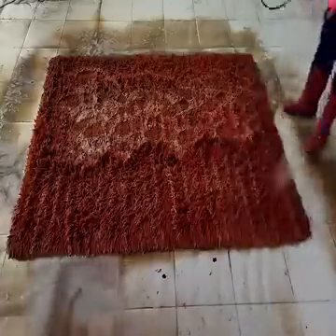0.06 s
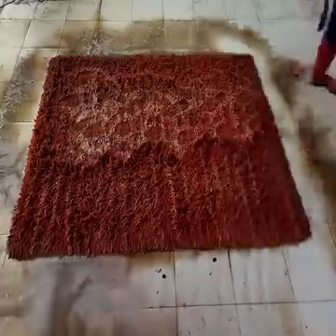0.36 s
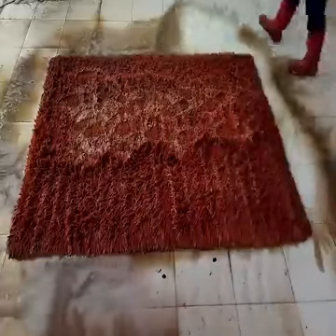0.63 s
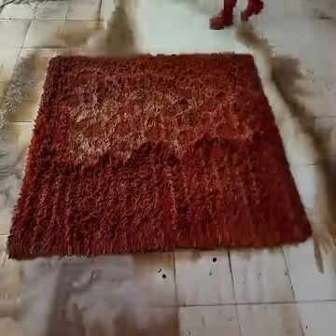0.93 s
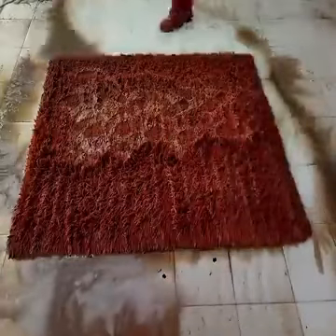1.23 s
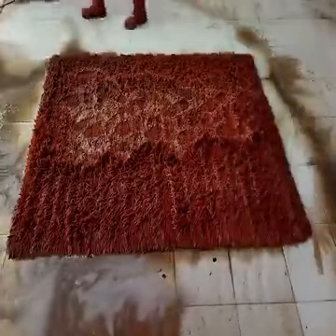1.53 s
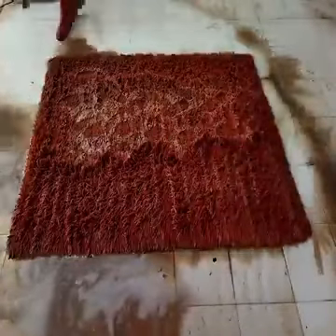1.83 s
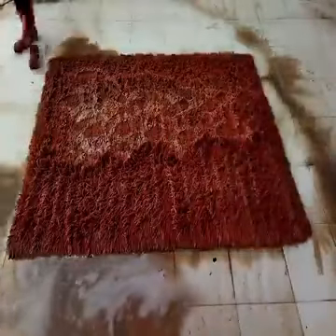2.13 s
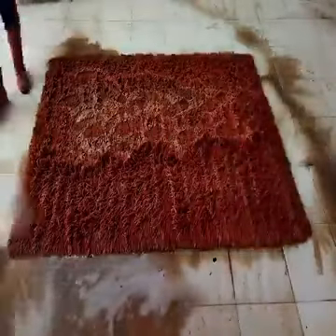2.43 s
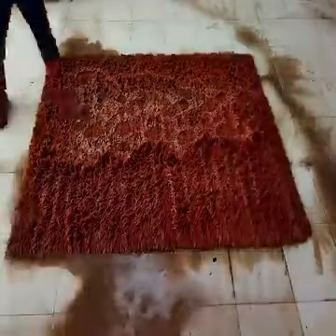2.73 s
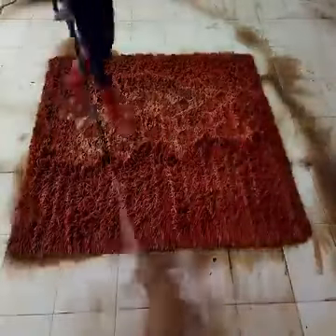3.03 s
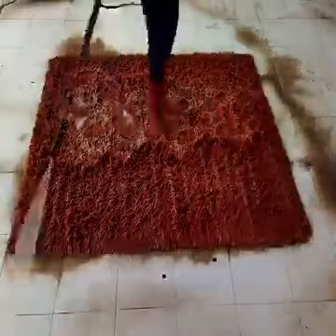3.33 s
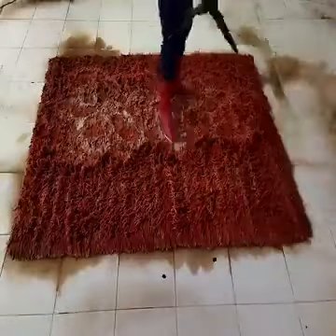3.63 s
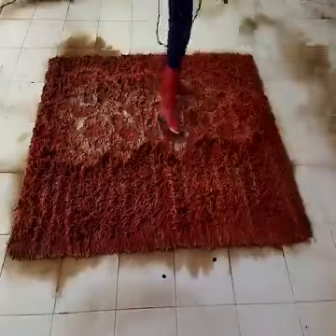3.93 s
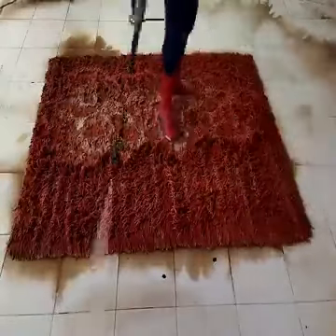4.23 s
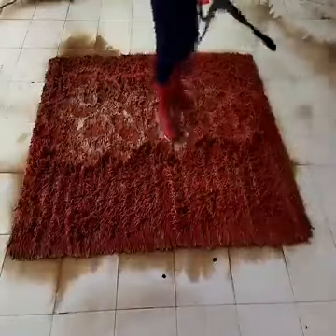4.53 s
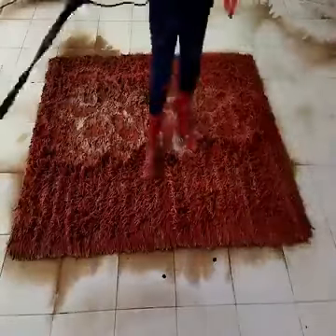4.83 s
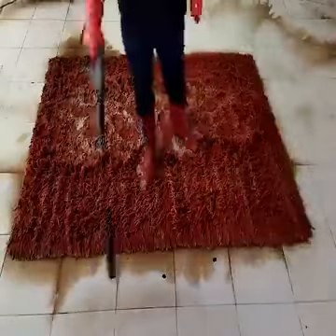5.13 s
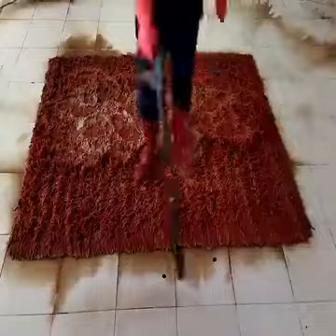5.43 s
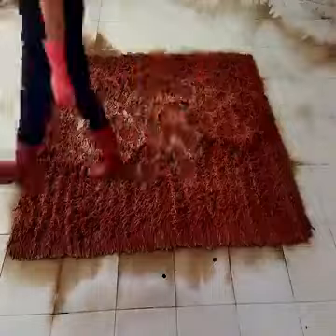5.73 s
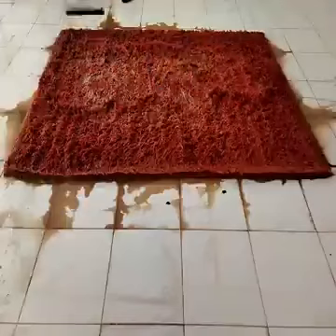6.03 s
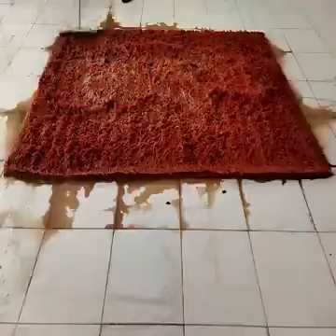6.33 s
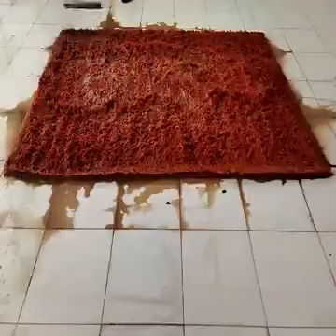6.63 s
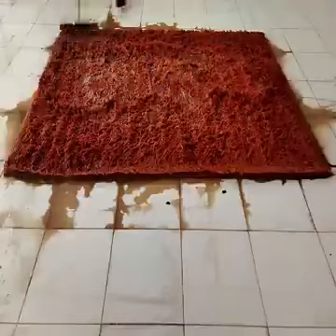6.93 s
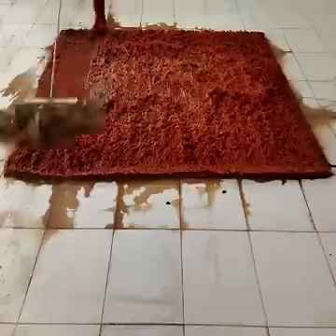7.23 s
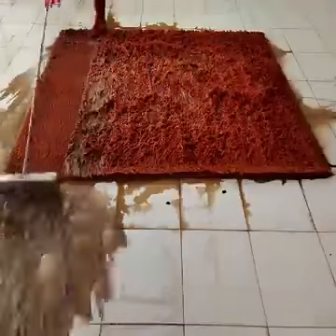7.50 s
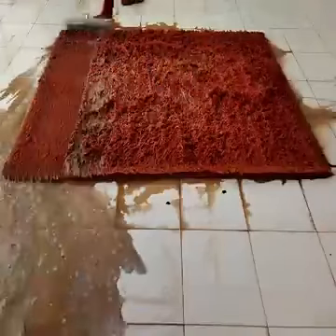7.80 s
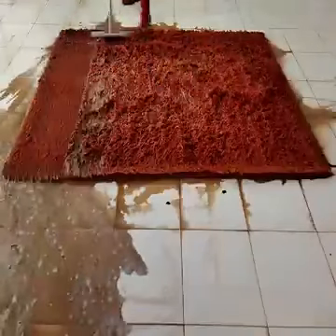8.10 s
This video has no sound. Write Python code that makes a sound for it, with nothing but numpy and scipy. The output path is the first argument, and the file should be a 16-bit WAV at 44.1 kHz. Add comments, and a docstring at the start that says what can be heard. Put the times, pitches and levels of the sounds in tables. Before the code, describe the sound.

In a reverberant tiled wash hall, the bright hiss of a water jet and a high, wavering pump whine hold steady, then cut off. Faint, distant wet slaps follow as a rubber squeegee is set on a soaked carpet. One sloshing, fizzy stroke ends in a sharp, ringing clatter on the floor, with water squirting toward the microphone and trickling away. Then another wet stroke starts.

```python
"""In a tiled wash hall, a pressure washer works over a shaggy carpet: its pump whines at multiples
of the shaft speed and its turbulent jet hisses, until both stop abruptly. A long-handled squeegee
is set down with wet slaps and pushed through the soaked pile, which sloshes and froths. Its head
drops off the edge and clatters on the tiles, ringing in its own modes; water spills, the hall
reverberates, and a second push follows."""
import sys
import numpy as np
from scipy import signal
from scipy.fft import rfft, irfft, next_fast_len
from scipy.io import wavfile
from scipy.ndimage import uniform_filter1d, map_coordinates

SR = 44100
rng = np.random.default_rng(int(sys.argv[2]) if len(sys.argv) > 2 else 0)


def wrap_up_sound(samples):
    """Save the sound to the file named by the first command line argument, as 16-bit audio."""
    columns = np.atleast_2d(samples).T
    # keep every value between -1 and 1, then stretch to whole-number steps
    tamed = np.clip(columns, -1, 1)
    steps = np.round(tamed * 32767).astype(np.int16)
    wavfile.write(sys.argv[1], SR, steps)


N = 368670
TIME = np.arange(N) / SR
SHAFT_HZ, STOP_S = 95.6, 5.98  # the pump's rotation rate; the moment the washer falls silent

# Pushes through the pile: start_s, length_s, relative_db, first_touch_lead_s
STROKES = [(7.107, .41, -39, 0.034), (8.204, .41, -39.5, 0.05)]
# Bounces of the head: start_s, relative_db, crack_tilt_db_per_octave, ring_tilt_db_per_octave
BOUNCES = [(7.5102, -6, 3, 2), (7.521, -2, -0.5, 1), (7.544, -7, -4, 6.5), (7.567, -7, -2.5, -2),
           (7.574, -9.5, -1.5, -2), (7.589, -6, -2, -1), (7.604, -7.5, 2, 4.5)]
# Spectrum of water squeezed out as froth: frequency_hz, relative_db
FROTH_SPECTRUM = [(1060, -35), (1800, -3.5), (4810, -6), (7540, -14.5), (8870, -12), (11300, -21),
                  (12800, -15), (15500, -26)]


def amp(db):
    """Amplitude ratio of a level in decibels."""
    return 10 ** (np.asarray(db) / 20)


def unit(x):
    """Normalisation to an rms of 1."""
    return x / np.sqrt(np.mean(x ** 2) + 1e-20)


def along(points, hz):
    """Interpolation of (frequency_hz, value) points on a logarithmic frequency axis."""
    frequencies, values = np.transpose(points)
    return np.interp(np.log(hz + 1), np.log(frequencies + 1), values)


def hump(centre_s, half_s):
    """A Gaussian envelope of height 1, down to 1/e at half_s from its centre."""
    return np.exp(-((TIME - centre_s) / half_s) ** 2)


def wobble(rate_hz):
    """Smooth random modulation: a spline through rate_hz random knots a second."""
    knots = rng.standard_normal(int(N * rate_hz / SR) + 4)
    return np.interp(TIME, TIME[::32], map_coordinates(knots, [TIME[::32] * rate_hz]))


def add(track, start_s, sound):
    """Superposition of a sound on the track from start_s on."""
    part = track[..., round(start_s * SR):][..., :sound.shape[-1]]
    part += sound[..., :part.shape[-1]]


def filtered(x, response):
    """Linear filtering: the spectrum of x is multiplied by a frequency response."""
    size = next_fast_len(x.shape[-1] + 8192, True)
    return irfft(rfft(x, size) * response(np.fft.rfftfreq(size, 1 / SR)), size)[..., :x.shape[-1]]


def diffuse(pair, colour):
    """A diffuse field of rms 1 from two unrelated signals: the ears agree in bass, not in treble."""
    # Stereo width of the field: frequency_hz, side_minus_mid_db
    width = [(40, -19), (130, -35), (260, -23.5), (500, -8.5), (800, -9), (1300, -2), (2200, 3), (4400, -1),
             (8000, 0.5), (15000, -1.5)]
    mid = filtered(pair[0], colour)
    side = filtered(pair[1], lambda hz: colour(hz) * amp(along(width, hz)))
    return unit(np.array([mid + side, mid - side]))


def rush(spectrum):
    """Diffuse noise: white noise filtered to the given spectrum."""
    return diffuse(rng.standard_normal((2, N)), lambda hz: amp(along(spectrum, hz)))


def burst(spectrum, tilt_db, t60_s):
    """An exponentially damped puff of noise of energy 1, tilted by tilt_db per octave."""
    t = np.arange(SR // 3) / SR
    puff = rng.standard_normal(len(t)) * amp(-60 * t / t60_s)
    puff = np.pad(puff, (48, 0))[:len(t)]  # room for the filter to spread the onset
    colour = lambda hz: amp(along(spectrum, hz) + tilt_db * np.log2(np.maximum(hz, 300) / 1000))
    puff = filtered(puff, colour)
    return puff / np.linalg.norm(puff)


def bubbles(count, centre_hz, spread, cycles, size_db):
    """Bubble resonance: brief damped sines with soft starts, at random moments for each ear."""
    n = np.arange(int(8 * cycles * SR / centre_hz))
    ears = []
    for ear in range(2):
        starts = (rng.random(count) * N).astype(int)[:, None]
        hz = np.clip(centre_hz * np.exp(spread * rng.standard_normal(count)), 200, SR / 3)[:, None]
        strength = amp(size_db * np.minimum(rng.exponential(size=count), 4))[:, None]
        age = hz * n / SR / cycles  # in decay time constants
        ring = strength * np.sin(2 * np.pi * cycles * age) * age * np.exp(-age)
        ears.append(unit(np.bincount((starts + n).ravel(), ring.ravel(), N)[:N]))
    return np.array(ears)


def drift(stray_hz):
    """Frequency modulation: the phase gathered by a tone whose pitch strays quickly."""
    return 2 * np.pi * np.cumsum(stray_hz * wobble(70)) / SR


def tone(phase, db, apart_rad):
    """A sine of rms level db; standing waves set its phase apart at the two ears."""
    phases = np.mod(phase, 2 * np.pi) + np.array([[.5], [-.5]]) * apart_rad
    return np.sqrt(2) * amp(db) * np.sin(phases.astype(np.float32))


def fading(depth_db):
    """Shifting standing waves raise and lower a tone's level in dB, differently at each ear."""
    return depth_db * np.array([wobble(6), wobble(6)])


def hall(x, direct_db, build_s):
    """Reverberation: the direct path, then a diffuse tail that builds up and decays band by band."""
    # Reverberation time of the tiled hall: frequency_hz, t60_s
    decay_times = [(100, 1.4), (400, 1.21), (750, 0.62), (1250, 1.02), (1800, 1.07), (4000, 1.02),
                   (7000, 0.93), (14000, 0.74)]
    hz, t, noise = signal.stft(rng.standard_normal((2, SR)), SR, nperseg=256)
    decay = amp(-60 * t / along(decay_times, hz)[:, None])
    tail = signal.istft(noise * decay * (1 - np.exp(-t / build_s)), SR, nperseg=256)[1]
    response = diffuse(tail, np.ones_like) / np.sqrt(tail.shape[1])
    response[:, 0] += amp(direct_db)
    return signal.fftconvolve(x[None], response, axes=1)


def hall_air():
    """Incoherent noises add in power: quiet air, a wash fading after the washer, run-off on tiles."""
    # Spectrum of the background: frequency_hz, relative_db
    air_spectrum = [(18, -58), (30, -31), (113, -16), (147, -3), (312, 1), (978, -9.5), (3980, -17.5),
                    (5880, -20), (7060, -19), (11900, -24.5), (15000, -31)]
    linger = (TIME > STOP_S) * amp(-55.5 - 37 * np.maximum(TIME - STOP_S, 0))
    runoff = (TIME > BOUNCES[0][0]) * amp(-63)
    return np.sqrt(amp(-65) ** 2 + linger ** 2 + runoff ** 2) * rush(air_spectrum)


def bumps():
    """Narrow-band noise in short swells is heard as hollow bumps, under the washer and as it stops."""
    # Dull bumps: centre_s, half_length_s, pitch_hz, width_hz, level_db
    dull_bumps = [(2.083, 0.016, 700, 220, -30), (5.83, 0.031, 570, 120, -44), (5.875, 0.024, 393, 50, -42)]
    out = np.zeros(N)
    for centre_s, half_s, pitch_hz, width_hz, db in dull_bumps:
        band = filtered(rng.standard_normal(N), lambda hz: np.exp(-((hz - pitch_hz) / width_hz) ** 2))
        out += amp(db) * hump(centre_s, half_s) * unit(band)
    return out


def blade_slaps():
    """Rubber lands on wet pile far off, so the reverberant sound outweighs the direct puff."""
    # Wet slaps: start_s, relative_db, tilt_db_per_octave, t60_s, rise_s
    landings = [(6.012, -43, -6, 0.087, .004), (6.186, -35.5, 0, 0.081, 0.0051),
                (6.37, -38, -0.8, 0.26, .003), (6.718, -50, 2.5, 0.36, 0.0045),
                (7.017, -30, 0.5, 0.09, .001), (7.127, -32.5, -9, 0.14, .006), (8.128, -37, 0, .2, .006),
                (8.201, -30.5, -2.5, 0.037, .001)]
    # Spectrum of a slap: frequency_hz, relative_db
    slap_spectrum = [(100, -42), (200, -20), (500, -4), (800, 2), (1100, -3.5), (1600, 1.5), (2300, -2.5),
                     (4000, -3), (7000, -9), (11000, -12), (15500, -18)]
    out = np.zeros((2, N))
    for start_s, db, tilt_db, t60_s, rise_s in landings:
        click = burst(slap_spectrum, tilt_db, t60_s=.00001)
        add(out, start_s, amp(db + 22.5) * hall(click, direct_db=-60, build_s=rise_s + t60_s / 20))
        add(out, start_s, amp(db + 14.5) * burst(slap_spectrum, tilt_db, t60_s))
    return out


def stroke_envelope(attack_s, db_per_s, from_first_touch):
    """Exponential attack, sloping hold and exponential release as the water settles after each push."""
    total, settle_s = np.zeros(N), .06
    for start_s, length_s, db, lead_s in STROKES:
        attack = 1 - np.exp(-np.maximum(TIME - start_s + from_first_touch * lead_s, 0) / attack_s)
        hold = amp(db + db_per_s * np.clip(TIME - start_s, 0, length_s))
        release = np.exp(-np.maximum(TIME - start_s - length_s, 0) / settle_s)
        total += attack * hold * release
    return total


def blade_pushes():
    """Slipping tufts excite the blade's resonance; the water wrung from them sloshes and froths."""
    # Spectrum of the wave ahead of the blade: frequency_hz, relative_db
    slosh_spectrum = [(47, -50), (80, -26), (118, -22), (145, -25), (194, -19), (383, -8.5), (527, -8),
                      (756, -6), (1050, -4.5), (1400, -0.5), (2200, -14), (2860, -21), (4840, -70)]
    tufts_per_s, blade_hz, blade_width_hz = 1200, 767, 110
    # The wave forms at once and thins; the froth grows as the blade comes nearer.
    wave = stroke_envelope(attack_s=.031, db_per_s=-11, from_first_touch=False)
    foam = stroke_envelope(attack_s=.1, db_per_s=7, from_first_touch=True)
    froth = bubbles(count=6000, centre_hz=3440, spread=.68, cycles=1.26, size_db=4)
    slips = (rng.random((2, N)) < tufts_per_s / SR) * rng.choice([-1, 1], size=(2, N))
    scrape = diffuse(slips, lambda hz: 1 / (1 + ((hz - blade_hz) / blade_width_hz) ** 2))
    slosh = amp(-1.7 + wobble(35)) * rush(slosh_spectrum)
    fizz = amp(.5 + .92 * wobble(25)) * rush(FROTH_SPECTRUM)
    # The scrape peaks in mid-stroke, when the blade moves fastest.
    crest = sum(amp(db - 4.5) * hump(start_s + .19, half_s=.14) for start_s, _, db, _ in STROKES)
    return wave * slosh + crest * scrape + foam * (fizz + amp(-8) * froth)


def spill():
    """Water spills off the carpet onto the tiles: a cloud of bubble resonances swells and thins out."""
    rise_s, decay_db_per_s = .06, 60
    age = np.maximum(TIME - BOUNCES[1][0], 0)
    envelope = amp(-27 - decay_db_per_s * age) * (1 - np.exp(-age / rise_s))
    drops = bubbles(count=4000, centre_hz=2900, spread=.6, cycles=3, size_db=3.8)
    return envelope * diffuse(drops, np.ones_like)


def head_clatter():
    """Impact excitation: each bounce rings the head's damped modes, with a wet crack and hard smack."""
    # Modes of the squeegee head and handle: pitch_hz, relative_db, t60_s
    head_modes = [(359, -15.5, 0.23), (439, -5.5, 0.135), (470, -5, 0.21), (651.5, 8, 0.2), (689, 1.5, .16),
                  (772, 10, 0.087), (842, 5, 0.13), (955, -1, 0.069), (1188, 1.5, 0.24), (1225, -4.5, .17),
                  (1290, -5, .13), (1502, -1, 0.068), (1615, 1, 0.2), (2115, -7, 0.089)]
    # Spectrum of the contact with wet tiles: frequency_hz, relative_db
    crack_spectrum = [(80, -44), (180, -25.5), (300, -10.5), (480, -6.5), (590, -6), (850, 4), (1060, 2),
                      (1300, 5.5), (2000, -5), (2600, -4.5), (3200, -16), (4000, -9.5), (5000, -14.5),
                      (8000, -22), (15000, -36)]
    out, t = np.zeros((2, N)), np.arange(SR // 3) / SR
    soft_onset = np.sin(np.pi / 2 * np.minimum(t / .002, 1)) ** 2  # rubber cushions the contact
    for start_s, db, crack_tilt_db, ring_tilt_db in BOUNCES:
        ring = np.zeros(len(t))
        for hz, mode_db, t60_s in head_modes:
            strength = amp(mode_db + ring_tilt_db * np.log2(hz / 1000) + rng.normal(0, 2.2))
            ring += strength * np.sin(2 * np.pi * (hz * t + rng.random())) * amp(-60 * t / t60_s)
        ring *= soft_onset
        ring = hall(ring / np.linalg.norm(ring), direct_db=1, build_s=.0044)
        crack = hall(burst(crack_spectrum, crack_tilt_db, t60_s=.068), direct_db=-12.5, build_s=.0044)
        smack = burst(crack_spectrum, crack_tilt_db, t60_s=.018)
        add(out, start_s, amp(db + 15.5) * (ring + crack))
        add(out, start_s, amp(db + 4.5) * smack)
    # The hardest bounce also thumps the floor.
    thud = np.sin(2 * np.pi * 60 * t) * np.exp(-t / .0045)
    add(out, BOUNCES[1][0], amp(-33 + np.array([[-1.6], [1.6]])) * thud)
    # The first contact squirts the water film under the blade straight at the microphone.
    squirt = hall(burst(FROTH_SPECTRUM, tilt_db=3, t60_s=.07), direct_db=1, build_s=.03)
    add(out, BOUNCES[0][0], amp(-3) * squirt)
    return out


def pump_whines():
    """Shaft harmonics: a clean whine at the 11th, rougher ones at the 15th and 16th."""
    # Level contour of the main whine: time_s, relative_db
    contour = [(0.0, -35.5), (0.15, -33), (1.78, -31.5), (1.88, -35.5), (2.07, -34), (2.19, -28.5),
               (2.34, -35), (2.68, -32), (3.12, -34), (3.29, -30), (3.52, -32.5), (4.69, -33.5),
               (4.97, -30), (5.2, -33), (5.73, -31.5), (5.8, -38.5), (5.86, -31)]
    # Swells of the second whine: centre_s, half_length_s, relative_db
    swells = [(1.05, .14, -45), (1.396, 0.036, -42), (1.833, .08, -42), (2.03, 0.052, -44),
              (2.33, 0.075, -49), (2.65, 0.14, -40.5), (3.11, 0.036, -38.5), (3.48, .14, -42),
              (3.76, .1, -44), (4.45, 0.18, -40), (4.75, .11, -39), (5.768, 0.16, -40), (5.958, 0.035, -43)]
    unload_s, drop_db_per_s = 5.882, 173  # a valve unloads the pump and the main whine dies quickly
    shaft = 2 * np.pi * SHAFT_HZ * TIME
    main_db = np.interp(TIME, *np.transpose(contour)) - drop_db_per_s * np.maximum(TIME - unload_s, 0)
    main_phase = 11 * shaft + 1.24 * wobble(3.16) + .088 * wobble(40)
    main = tone(main_phase, main_db + 2 + fading(.97), apart_rad=.097 + .1 * wobble(9.8))
    swell = amp(-48.5) + sum(amp(db) * hump(centre_s, half_s) for centre_s, half_s, db in swells)
    second_db, third_db = 20 * np.log10(swell), -37.5 - 1.37 * TIME
    second = tone(15 * shaft + drift(7.1), second_db + fading(.5) + 2.25 * wobble(50), apart_rad=.83)
    third = tone(16 * shaft + drift(6.1), third_db + fading(.1) + 1.4 * wobble(50), apart_rad=1)
    return main * amp([[.9], [-.9]]) + second * amp([[1.8], [-1.8]]) + third


def pump_drone():
    """Line spectra over a rumble: fuzzy pump tones wavering in pitch and level, and thin motor tones."""
    # Wavering tones of the pump: shaft_multiple, relative_db, ear_phase_difference_rad
    pump_tones = [(2.972, -53.5, 0.063), (4.083, -57, 0.7), (4.987, -45.5, 0.11), (6.01, -51.5, 1.45),
                  (7.07, -65, 1.1), (8.12, -55, .76), (8.985, -44, 0.91), (12.95, -50, 0.94),
                  (17.07, -54.5, .8), (17.98, -43.5, 2.08), (20, -51.5, 1.9), (27.04, -56, 0.47)]
    # Tones of the motor and its drive: pitch_hz, relative_db
    motor_tones = [(947.5, -53), (966, -57), (1035, -53), (1157, -53.5), (2000, -64), (3446, -69),
                   (8554, -55.5), (8656, -65), (8742, -66), (8931, -63.5), (9028, -60.5), (9219, -63.5),
                   (9410, -67), (14061, -69)]
    # Spectrum of the rumble: frequency_hz, relative_db
    rumble_spectrum = [(25, -41), (100, -19), (170, -9), (270, 2), (450, 4.5), (750, 3), (1100, 7.5),
                       (1600, 3.5), (2200, -4.5), (4000, -46)]
    shaft = 2 * np.pi * SHAFT_HZ * TIME
    comb = sum(tone(multiple * shaft + drift(11), db + 1.5 * wobble(20), apart_rad)
               for multiple, db, apart_rad in pump_tones)
    motor = sum(tone(2 * np.pi * hz * TIME + drift(.00047 * hz), db, apart_rad=.45)
                for hz, db in motor_tones)
    rumble = amp(-37.5 + .55 * wobble(10)) * rush(rumble_spectrum)
    return amp(-.97) * comb + amp(1.8) * motor + rumble


def water_jet():
    """The spray hisses as broadband noise; sweeps across the pile swell it and throw up drops."""
    # Sweeps of the jet: centre_s, half_length_s, rise_db
    sweeps = [(2.8, 0.39, 0.5), (3.31, 0.024, 2.3), (3.465, .07, 2), (4.22, 0.036, 2.5), (4.372, .09, 1.2),
              (4.83, .05, 1), (5.172, 0.042, 2.5), (5.494, 0.047, 2.5), (5.66, .05, -0.5)]
    # Spectrum of the hiss: frequency_hz, relative_db
    hiss_spectrum = [(1060, -27.5), (1800, -3), (2200, -2.5), (3190, -2), (3530, -0.5), (5510, -3),
                     (7100, -1), (8140, -4.5), (8350, -5.5), (8830, -6), (9850, -9.5), (12900, -9.5),
                     (15100, -12.5), (15800, -13)]
    warble_db, tremolo_hz = 2.6, 86
    aim_db = sum(db * hump(centre_s, half_s) for centre_s, half_s, db in sweeps)
    aim_db -= .9 * hump(3.88, half_s=.38)  # the lance points away from the carpet for a moment
    noise = signal.stft(rng.standard_normal((2, N)), nperseg=1024)[2]
    # A grainy, watery warble like compressed audio is laid over the hiss.
    warble = uniform_filter1d(rng.standard_normal(noise.shape[1:]), size=5, axis=0)
    warble = unit(uniform_filter1d(warble, size=4, axis=1))
    spray = signal.istft(noise * amp(warble_db * warble), nperseg=1024)[1][:, :N]
    spray = diffuse(spray, lambda hz: amp(along(hiss_spectrum, hz)))
    # A faint tremolo effect is laid over it too.
    tremolo = 1 + .032 * np.sin(2 * np.pi * tremolo_hz * TIME + .4 * wobble(5.4))
    hiss = amp(-34 + aim_db + .62 * wobble(25.86)) * tremolo * spray
    drops = bubbles(count=7000, centre_hz=5750, spread=.515, cycles=1.43, size_db=3)
    return hiss + amp(-48.5 + 1.9 * aim_db) * drops  # the spatter surges more than the hiss


def pressure_washer():
    """Pump and jet run steadily, decay exponentially once the trigger is let go, then stop dead."""
    release_s, run_down_db_per_s = 5.857, 79
    run_down = amp(-run_down_db_per_s * np.maximum(TIME - release_s, 0))
    running = np.clip((STOP_S - TIME) / .004 + .5, 0, 1)
    return running * run_down * (pump_whines() + pump_drone() + water_jet())


def scene():
    """Superposition of the sources: the washer, then the squeegee in the quiet hall."""
    return (pressure_washer() + bumps() + blade_slaps() + blade_pushes() + head_clatter()
            + spill() + hall_air())


def record(dry):
    """Band limiting: the microphone passes nothing above 15850 Hz."""
    return filtered(dry, lambda hz: hz < 15850)


dry = scene()
out = record(dry)
wrap_up_sound(out)
```